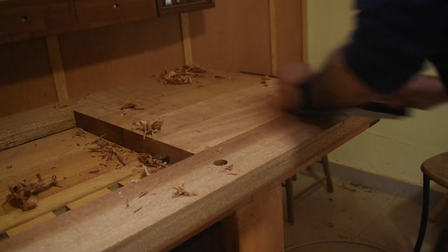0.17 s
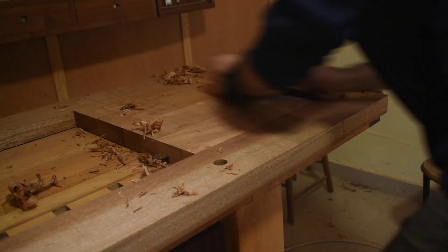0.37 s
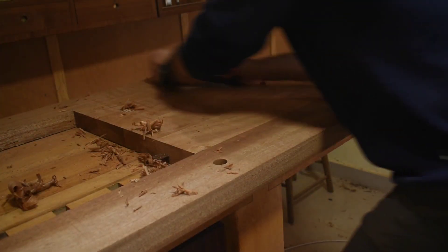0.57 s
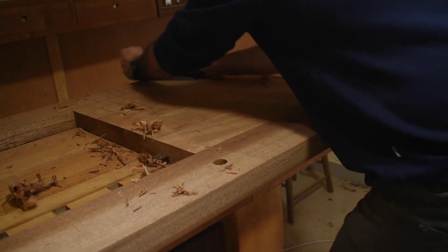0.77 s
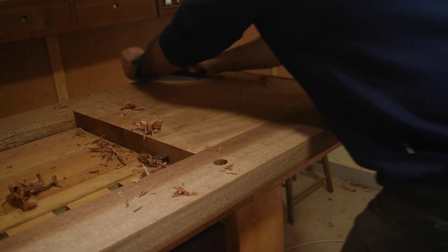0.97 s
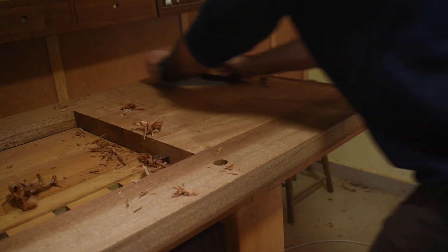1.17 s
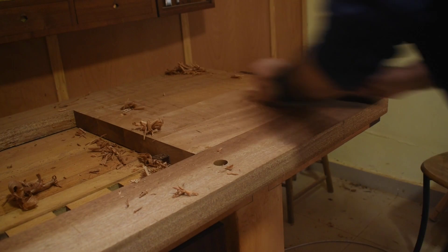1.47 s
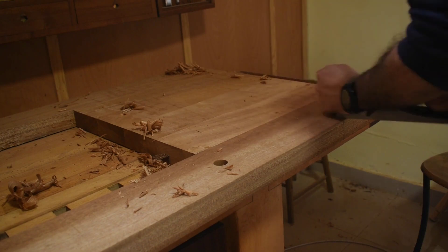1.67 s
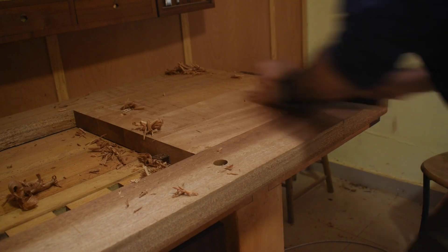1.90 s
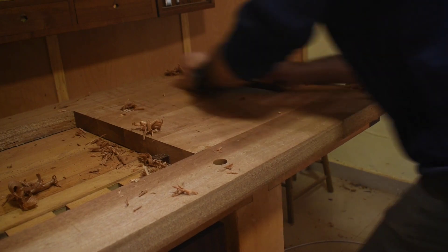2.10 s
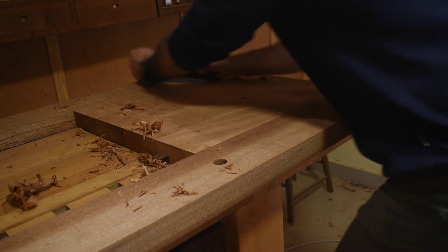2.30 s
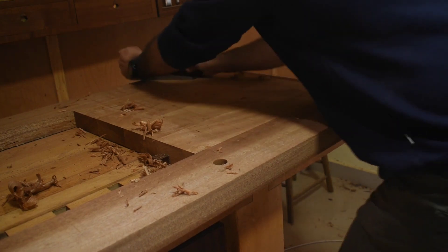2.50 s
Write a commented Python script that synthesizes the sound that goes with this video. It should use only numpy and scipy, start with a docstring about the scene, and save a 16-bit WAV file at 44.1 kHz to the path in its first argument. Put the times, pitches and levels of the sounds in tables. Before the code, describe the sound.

A hand plane rasps along a wooden board, drags back, and pushes again with hollow knocks.

```python
"""A dry wooden rub swells into the rasp of a hand plane: push, drag back, push again, in a small workshop.
The sole rubs the grain both ways; the iron chatters as it bites and, going forward, snaps fibres
and tears a hissing shaving. The plane knocks; rasp and hiss dip briefly just after the heavy knocks.
Board and bench ring under it all, over a low room tone."""
import sys
import numpy as np
from scipy import signal
from scipy.fft import rfft, irfft
from scipy.io import wavfile
from scipy.ndimage import uniform_filter1d

SR = 44100
rng = np.random.default_rng(int(sys.argv[2]) if len(sys.argv) > 2 else 0)


def dump(signal):
    """Clip the signal to [-1, 1] and save it as 16-bit WAV at the path in sys.argv[1]."""
    limited = np.clip(np.atleast_2d(signal).T, -1, 1)
    pcm = np.round(limited * 32767).astype(np.int16)
    wavfile.write(sys.argv[1], SR, pcm)


N = 116865
T = np.arange(N) / SR

# scrape of the iron, one envelope each for push, light drag back, push (time [s], level [dB])
RASP_ENVELOPES = [
    [(.09, -44.5), (.18, -29.5), (.26, -25.5), (.44, -26.5), (.54, -23), (.61, -26), (.71, -30), (.79, -37),
     (.88, -49)],
    [(.96, -64), (1.07, -41), (1.18, -38.5), (1.29, -33), (1.5, -28), (1.62, -36), (1.74, -54)],
    [(1.81, -46.5), (1.91, -33.5), (1.97, -28.5), (2.1, -28), (2.19, -21.5), (2.26, -30), (2.35, -29),
     (2.43, -37.5), (2.54, -49.5)],
]
# tone of snapping fibres (frequency [Hz], gain [dB])
RASP_EQ = [(50, -53), (150, -43), (400, -4), (800, -2), (1400, 5), (2000, 3.5), (2800, 0), (3900, -1.5),
           (5000, -10), (7000, -18), (10000, -25), (15000, -37)]
# hiss of the shaving curling out, one envelope per push (time [s], level [dB])
HISS_ENVELOPES = [
    [(.08, -64), (.19, -63), (.26, -47.5), (.38, -46), (.46, -43.5), (.6, -46), (.7, -48), (.78, -59),
     (.88, -66)],
    [(1.83, -74), (1.92, -64), (1.97, -49), (2.1, -44), (2.24, -48), (2.33, -48.5), (2.4, -53.5),
     (2.46, -66), (2.54, -70)],
]
# airy tone of the curl (frequency [Hz], gain [dB])
HISS_EQ = [(500, -58), (3000, -20), (5500, 2), (7500, -3.5), (10000, -7), (15000, -15.5)]
# rasp and hiss dip briefly just after the heavy knocks (time [s])
DIP_TIMES = [0.644, 2.281]
FIBRES_PER_S, FIBRE_SPREAD_DB = 7000, 4.5

def shaving(dip_half_s=0.014, dip_db=-12.5):
    """Fibres snap at the iron and the shaving hisses out; the level dips briefly once in each push."""
    snaps = grains(FIBRES_PER_S, FIBRE_SPREAD_DB) * undb(-0.5 * wander(170))
    rasp = rubbed_board(colour(snaps, RASP_EQ), ring_db=5) * envelope(*RASP_ENVELOPES)
    curl = grains(per_s=6300, spread_db=-1)
    hiss = unit(colour(curl, HISS_EQ)) * envelope(*HISS_ENVELOPES)
    dip = sum(swell(at, dip_half_s) for at in DIP_TIMES)
    return (rasp + hiss) * undb(dip_db * dip)

# the iron digs in at the fastest part of each push (time [s], half length [s], level [dB])
BITE_ACCENTS = [(0.542, 0.047, -34), (2.17, .045, -36)]
# bright edge of the tear (frequency [Hz], gain [dB])
BITE_EQ = [(500, -42), (2000, -15), (2700, 2), (3900, 2), (5200, -16), (15000, -40)]

def bite():
    """The shaving tears more brightly where the iron digs in."""
    depth = sum(undb(db) * swell(at, half_s) for at, half_s, db in BITE_ACCENTS)
    snaps = grains(FIBRES_PER_S, FIBRE_SPREAD_DB)
    return unit(colour(snaps, BITE_EQ)) * depth

# slide of the sole, one envelope per stroke (time [s], level [dB])
SOLE_ENVELOPES = [
    [(0, -19), (.03, -27.5), (.11, -35), (.2, -33), (.3, -30.5), (.5, -30.5), (.7, -27), (.8, -32),
     (.93, -46.5)],
    [(.97, -46), (1.07, -41), (1.18, -25), (1.235, -37), (1.29, -26), (1.42, -28), (1.52, -32),
     (1.64, -25.5), (1.72, -32), (1.79, -41)],
    [(1.8, -38.5), (1.88, -29.5), (1.95, -26.5), (2.2, -35.5), (2.29, -24), (2.35, -29), (2.43, -31),
     (2.52, -41.5), (2.62, -57)],
]
# dull tone of the rub (frequency [Hz], gain [dB])
SOLE_EQ = [(50, -69.5), (150, -15), (260, -6.5), (420, -0.5), (700, 0), (1130, -2), (1700, -6.5),
           (2300, -11), (3600, -23), (6000, -34.5), (15000, -58)]

def sole(rough_db=2.5):
    """The sole catches and slips on the grain, swelling and fading with each stroke."""
    friction = grains(per_s=14000, spread_db=2) * undb(rough_db * wander(230))
    return rubbed_board(colour(friction, SOLE_EQ), ring_db=-11) * envelope(*SOLE_ENVELOPES)

# judder of the iron (start [s], length [s], pitch [Hz], glide [Hz/s], wobble [Hz], level [dB])
CHATTER_SPELLS = [(0.194, 0.11, 712, 0, 42.3, -27), (0.187, 0.12, 892, 0, 78.9, -26),
                  (0.251, 0.041, 1146, 0, 61.5, -22), (0.326, 0.12, 880, 0, 47.2, -24.5),
                  (0.294, 0.11, 1121, -6, 75.4, -27.5), (0.462, 0.056, 860, 0, 60.3, -31),
                  (1.48, 0.073, 1077, 645, 52, -25), (1.529, 0.097, 1484, 1698, 115.1, -31.5),
                  (1.58, 0.068, 1140, -150, 54.4, -35), (1.626, 0.095, 692, 0, 22.4, -33),
                  (1.899, 0.067, 714, 3, 30, -28), (1.917, 0.17, 1132, -12, 95.6, -29),
                  (1.964, 0.26, 881.7, -0.5, 95.7, -29), (2.115, 0.12, 1114, -2, 86.6, -32.5)]

def chatter(fade_s=0.018, rough_db=2.5):
    """Spells of uneven stick-slip add a rough, hollow note, which bends up during the drag back."""
    spells = np.zeros(N)
    for start, length, hz, glide, wobble_hz, db in CHATTER_SPELLS:
        slip_hz = hz + glide * np.clip(T - start, 0, length) + wobble_hz * wander(418)
        tone = np.sin(2 * np.pi * np.cumsum(slip_hz) / SR)
        flutter = undb(rough_db * wander(204))
        gate = np.clip(np.minimum(T - start, start + length + fade_s - T) / fade_s, 0, 1)
        spells += undb(db) * unit(tone * flutter) * gate
    return spells

# hits of the plane on the board; the hollow note depends on where it strikes
# (time [s], relative rattle level [dB], brightness [Hz], note pitch [Hz], note level [dB])
KNOCK_HITS = [(.001, -23, 900, 516, -22), (0.041, -15, 400, 289, -30), (0.609, 3, 1670, 396, -19.5),
              (.616, -3, 704, 297, -26), (.638, 3.5, 500, 418.6, -18.5), (.685, -3, 600, 416, -17.5),
              (.709, -9.5, 1820, 455, -35), (.764, -12, 450, 438, -30), (1.255, -3, 840, 600, -24),
              (1.268, -1, 434, 431, -21), (1.275, -2, 300, 254.4, -19), (1.318, -8, 600, 512, -20),
              (1.379, -1.5, 505, 539, -17.5), (1.396, -10, 400, 282, -23.5), (1.598, -4, 700, 557, -22),
              (1.815, -6, 650, 451, -31), (1.848, -7, 260, 234, -22), (2.250, 3.5, 1900, 706, -23),
              (2.253, 0, 580, 438.5, -14.5), (2.267, 1.5, 530, 705, -20), (2.326, -7.5, 514, 435.5, -14.5),
              (2.357, -7, 1200, 439, -26), (2.410, -17, 473, 433, -24), (2.465, -14, 488, 446, -30)]
# woody body of a hit (frequency [Hz], gain [dB])
THUD_EQ = [(40, -40), (90, -26), (150, -5), (250, 0), (420, 1.5), (1050, 4), (1800, 2.5), (2500, -11),
           (4000, -0.5), (7000, -22), (15000, -53)]

def knocks(rattle_s=0.0033, rattle_gain_db=17, note_attack_s=0.0036, note_t60_s=0.15):
    """Each blow is a brief rattle, duller for softer contacts, and leaves a hollow note ringing."""
    force, notes = np.zeros(N), np.zeros(N)
    note_shape = (1 - np.exp(-T / note_attack_s)) * decay(note_t60_s)
    for start, db, bright_hz, note_hz, note_db in KNOCK_HITS:
        burst = rng.standard_normal(N) * T * np.exp(-T / rattle_s)
        blow = butter(burst, 2, bright_hz, "low")
        # brighter blows carry more energy
        blow *= undb(db + rattle_gain_db) * np.sqrt(2 * bright_hz / SR) / np.linalg.norm(blow)
        note = undb(note_db) * np.sin(2 * np.pi * note_hz * T) * note_shape
        at = int(start * SR)
        force[at:] += blow[:N - at]
        notes[at:] += note[:N - at]
    thud = colour(force, THUD_EQ)
    return thud + board(thud, ring_db=-8.5) + notes

# resonances of the board (frequency [Hz], relative level [dB], t60 [s])
BOARD_MODES = [(259, 0, 0.15), (322, -2, 0.12), (377, -0.5, 0.32), (412, -2, 0.27), (438.3, -1, 0.41),
               (597, 1.5, 0.033), (693, -6, 0.18), (877, -9, 0.11), (850, -5, 0.18), (940, -4.5, 0.063),
               (1090, -2.5, 0.33), (1133, -4.5, 0.11), (1500, -23, 0.11), (2077, -12.5, 0.12),
               (2313, -7.5, 0.073), (2660, -2, 0.03)]

def board(drive, ring_db):
    """The board rings at its modes when struck or rubbed."""
    return undb(ring_db) * ringing(drive, BOARD_MODES) * 300 / SR

def rubbed_board(friction, ring_db, low_cut_hz=664):
    """Friction noise plus the board's ring; light rubbing hardly moves the low modes."""
    drive = butter(friction, 2, low_cut_hz, "high")
    return unit(friction + board(drive, ring_db))

# resonances of the bench (frequency [Hz], relative level [dB], t60 [s])
BENCH_MODES = [(131.3, -2.5, 0.75), (173.5, 7, 0.2), (201, 3, 0.16), (235.6, 16.5, 0.086)]
# swell of its bass drone (time [s], level [dB])
BENCH_ENVELOPE = [(0, -47), (.15, -43.5), (.55, -47), (.66, -40), (.8, -40.5), (1.0, -49.5), (1.2, -52),
                  (1.4, -50.5), (1.58, -43), (1.75, -41), (1.88, -38), (2.0, -41.5), (2.2, -49),
                  (2.35, -41.5), (2.64, -47.5)]

def bench():
    """The work shakes the low modes of the bench into a drone."""
    shake = butter(rng.standard_normal(N), 3, [115, 300], "band")
    return unit(ringing(shake, BENCH_MODES)) * envelope(BENCH_ENVELOPE)

def room(x, t60_s=0.66, treble_t60_s=0.22, split_hz=5560, predelay_s=0.0041, wet_db=-6):
    """Adds dense reflections from panelled walls; the treble dies first."""
    noise = rng.standard_normal(N)
    low = butter(noise, 3, split_hz, "low") * decay(t60_s)
    high = butter(noise, 3, split_hz, "high") * decay(treble_t60_s)
    tail = (low + high) * (T > predelay_s)
    wet = undb(wet_db)
    return (x + wet * convolve(x, tail / np.linalg.norm(tail))) / np.hypot(1, wet)

# dark air of the workshop (frequency [Hz], gain [dB])
ROOM_TONE_EQ = [(25, -53), (70, -19), (130, -24.5), (300, -3), (1000, -8.5), (3000, -23.5), (8000, -42.5),
                (15000, -60)]

def room_tone(level_db=-45.5):
    """A faint, steady bed of low noise."""
    return undb(level_db) * unit(colour(rng.standard_normal(N), ROOM_TONE_EQ))

# stereo width, side against mid (frequency [Hz], gain [dB])
WIDTH_EQ = [(60, -13), (500, -64), (1500, -25), (4000, -19), (8000, -9.5), (15000, -10.5)]

def stereo_side(mid, smear_s=0.047):
    """A diffuse smear widens the treble and deep bass; the midrange stays narrow."""
    scatter = rng.standard_normal(N) * np.exp(-T / smear_s)
    return colour(convolve(mid, scatter / np.linalg.norm(scatter)), WIDTH_EQ)

def undb(db):
    """Decibels to gain."""
    return 10 ** (np.asarray(db) / 20)

def unit(x):
    """Scale to rms 1."""
    return x / np.sqrt(np.mean(x ** 2))

def decay(t60_s):
    """Gain that falls 60 dB in t60_s."""
    return undb(-60 * T / t60_s)

def swell(at, half_s):
    """Bell curve peaking at 1."""
    return np.exp(-((T - at) / half_s) ** 2)

def envelope(*curves, fade_s=0.0018):
    """Summed gain of (time [s], level [dB]) curves, each dying away beyond its ends."""
    gain = np.zeros(N)
    for points in curves:
        times, db = np.array(points).T
        outside_s = np.abs(T - np.clip(T, times[0], times[-1]))
        gain += undb(np.interp(T, times, db)) * np.exp(-outside_s / fade_s)
    return gain

def wander(rate_hz):
    """Smooth random drift, rms 1."""
    span = int(SR / rate_hz)
    return unit(uniform_filter1d(uniform_filter1d(rng.standard_normal(N), span), span))

def grains(per_s, spread_db):
    """Dense tiny snaps of uneven size."""
    size = undb(spread_db * np.minimum(rng.exponential(size=N), 4))
    fires = rng.random(N) < per_s / SR
    return unit(fires * size * np.sign(rng.standard_normal(N)))

def convolve(x, response):
    """Pass a sound through an impulse response."""
    return signal.fftconvolve(x, response)[:N]

def butter(x, order, hz, kind):
    """Butterworth filter."""
    return signal.sosfilt(signal.butter(order, hz, kind, fs=SR, output="sos"), x)

def colour(x, points, size=4096):
    """Minimum-phase EQ through (frequency [Hz], gain [dB]) points."""
    hz, db = np.array(points).T
    bins_hz = np.maximum(np.arange(size // 2 + 1) * SR / size, 1)
    gain = undb(np.interp(np.log(bins_hz), np.log(hz), db))
    cepstrum = irfft(np.log(gain))
    cepstrum[1:size // 2] *= 2
    cepstrum[size // 2 + 1:] = 0
    return convolve(x, irfft(np.exp(rfft(cepstrum))))

def ringing(x, modes):
    """Sound of decaying modes driven by x."""
    response = sum(undb(db) * decay(t60) * np.cos(2 * np.pi * hz * T) for hz, db, t60 in modes)
    return convolve(x, response)

def scene(left_db=2.5):
    """Plane, bench and room tone, panned a little to the left."""
    plane = sole() + shaving() + bite() + chatter() + knocks()
    mid = room(plane) + bench() + room_tone()
    side = stereo_side(mid)
    return np.array([mid * undb(left_db / 2) + side, mid * undb(-left_db / 2) - side])

def record(dry, top_hz=15500):
    """A steep low-pass trims the very top."""
    return signal.sosfilt(signal.ellip(8, .2, 70, top_hz, fs=SR, output="sos"), dry)

dry = scene()
out = record(dry)
dump(out)
```